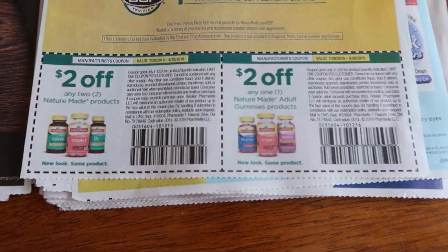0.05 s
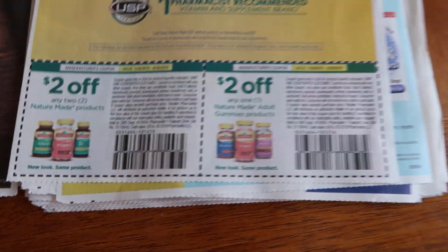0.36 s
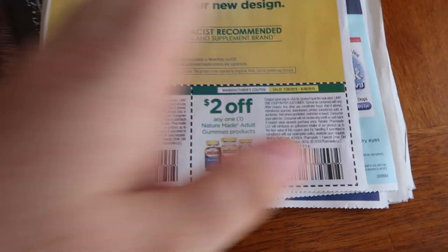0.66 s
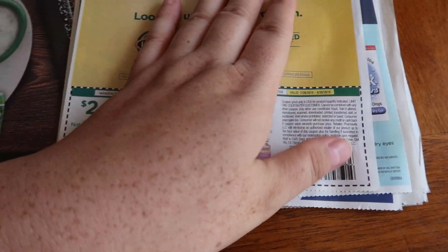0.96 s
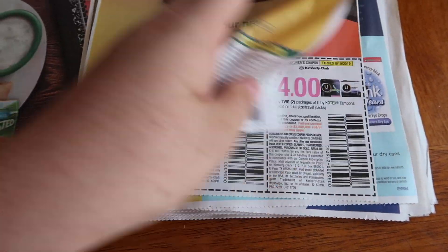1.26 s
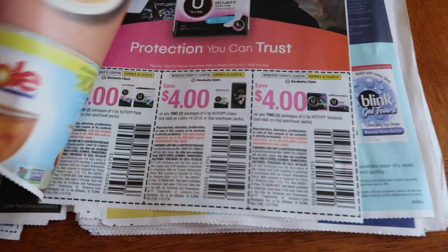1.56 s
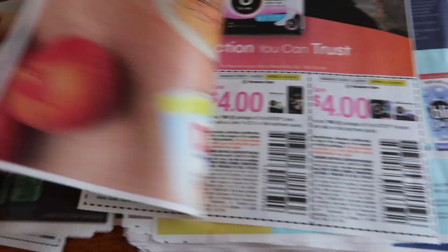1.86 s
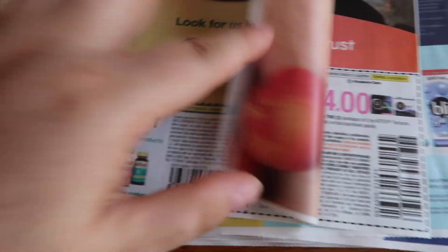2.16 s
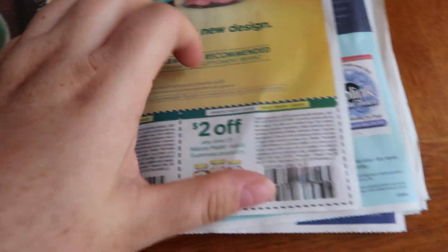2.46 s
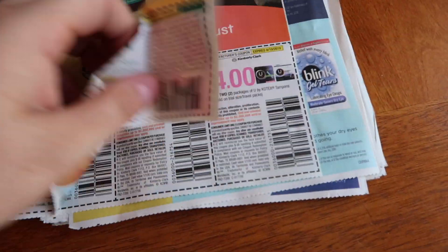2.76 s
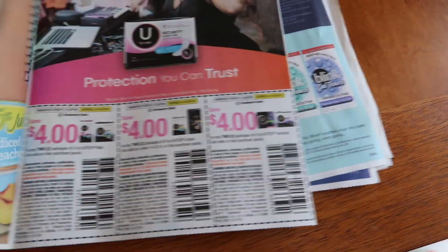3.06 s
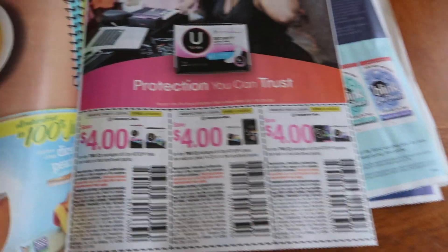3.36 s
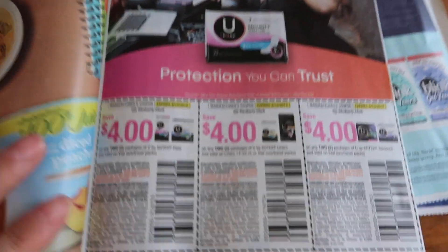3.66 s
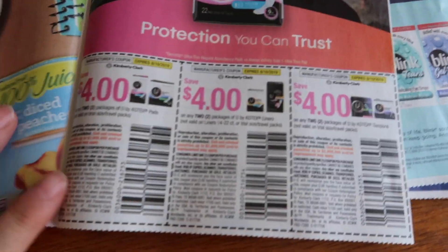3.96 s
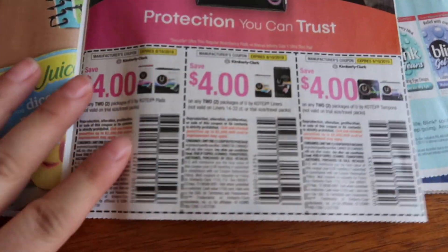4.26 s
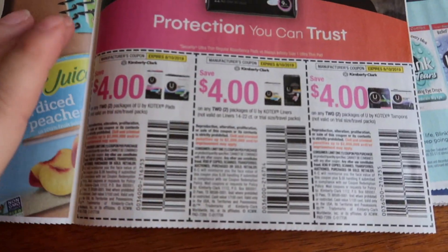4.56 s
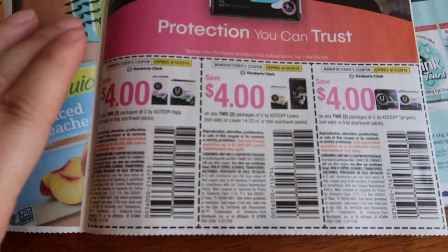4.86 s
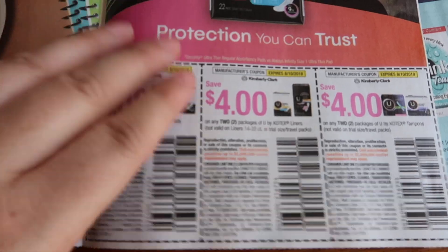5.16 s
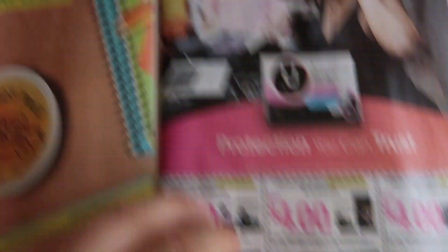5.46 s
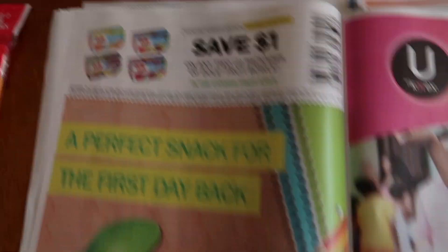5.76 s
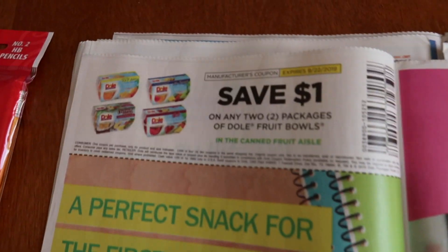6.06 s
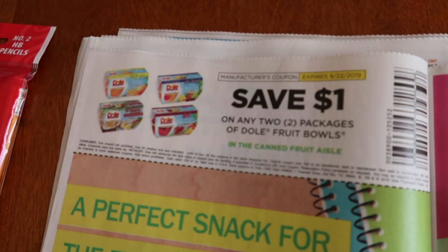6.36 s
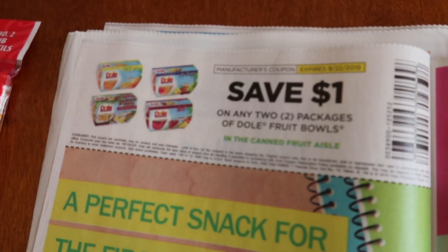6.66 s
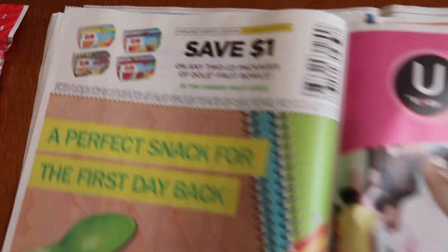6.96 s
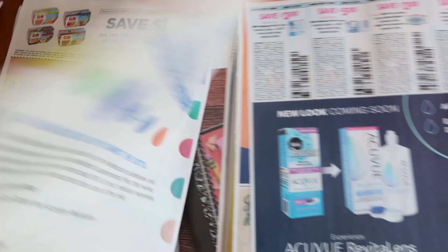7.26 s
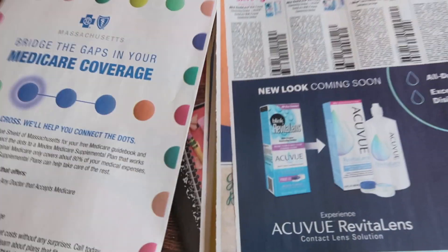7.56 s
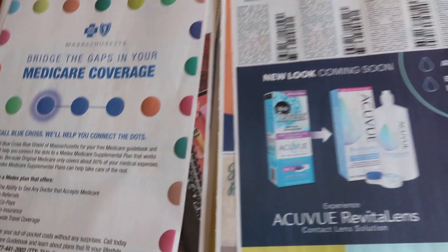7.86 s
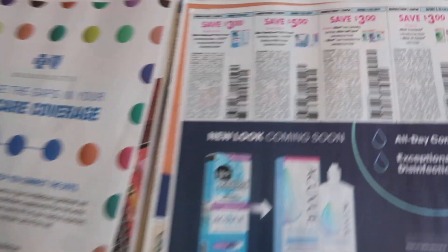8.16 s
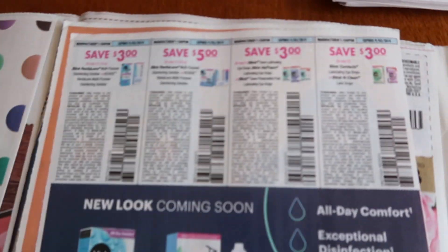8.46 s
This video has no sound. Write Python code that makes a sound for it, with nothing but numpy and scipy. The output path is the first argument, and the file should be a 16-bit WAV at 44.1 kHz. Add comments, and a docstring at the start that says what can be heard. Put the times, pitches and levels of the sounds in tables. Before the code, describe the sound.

Close to the microphone, thin glossy pages slide over each other with a grainy rustle, buckling, scraping and flapping as they are turned on a wooden table. A loud crisp snap stands out, and the stack lands with a thud soon after. Light sliding and scattered ticks lead to one last strong page flip. A faint steady appliance hum and low rush of air fill the small room throughout.

```python
"""An appliance hums over a low rush of air in a small room. Then thin glossy paper inserts are
leafed through on a wooden table, close to the microphone. Sheets slide over each other with grainy
friction, buckle with sharp snaps, scrape with their edges and flap down in swarms of clicks that
ring the paper's resonances. There are dull knocks on the table and soft puffs of air from
flapping pages; the stack is set down once with a thud."""
import sys
import numpy as np
from scipy import signal
from scipy.fft import rfft, irfft
from scipy.io import wavfile
from scipy.ndimage import uniform_filter1d, minimum_filter1d, map_coordinates

SR = 44100
rng = np.random.default_rng(int(sys.argv[2]) if len(sys.argv) > 2 else 0)


def put_to_file(sound):
    """Save the sound as 16-bit audio at rate SR, in the file named by the first command-line argument."""
    columns = np.atleast_2d(sound).T  # one column per channel
    safe = np.clip(columns, -1, 1)
    whole_steps = np.round(safe * 32767)
    wavfile.write(sys.argv[1], SR, whole_steps.astype(np.int16))


N = 374850
TIME_S = np.arange(N) / SR
AGE_S = np.arange(SR // 5) / SR   # time within one short event


def from_db(db):
    """Decibels to gain."""
    return 10 ** (np.asarray(db) / 20)


def unit_rms(x):
    """Scale to rms 1."""
    return x / np.sqrt(np.mean(x ** 2) + 1e-20)


def unit_blow(x):
    """Scale to the energy of 10 ms at rms 1."""
    return unit_rms(x) * np.sqrt(SR / 100 / x.shape[-1])


def at_bins(curve, size):
    """Interpolate a curve over log frequency at the FFT bins."""
    bin_hz = np.maximum(np.fft.rfftfreq(size, 1 / SR), 1)
    hz, values = np.transpose(curve)
    return np.interp(np.log(bin_hz), np.log(hz), values)


def band(x, low_hz, high_hz, order=2):
    """Causal band-pass."""
    edges_hz = np.clip([low_hz, high_hz], 10, .47 * SR)
    return signal.sosfilt(signal.butter(order, edges_hz, "band", fs=SR, output="sos"), x)


def resonance(x, hz, width):
    """One resonance; width relative to its pitch."""
    return band(x, hz / (1 + width), hz * (1 + width), order=1)


def coloured(x, spectrum):
    """Give a noise a spectrum; rms 1."""
    size = x.shape[-1]
    return unit_rms(irfft(rfft(x) * from_db(at_bins(spectrum, size)), size))


def drift(rate_hz):
    """Slow random curve, standard deviation 1."""
    knots = rng.standard_normal(N // 40)
    return np.interp(TIME_S * rate_hz, np.arange(len(knots)), knots) * np.sqrt(3 / 2)


def stereo(mid, side, correlation):
    """Left and right from two independent noises, correlated by frequency."""
    alike = at_bins(correlation, N)
    return irfft(np.sqrt(1 + alike) * rfft(mid) + np.sqrt(1 - alike) * rfft(side) * [[1], [-1]], N)


def add(out, start_s, sound):
    """Mix a sound in at a time."""
    start = round(start_s * SR)
    out[..., start:start + sound.shape[-1]] += sound[..., :N - start]


# motor and mains lines: f/Hz, level/dB
HUM_LINES = [(61, -62.5), (90, -85), (119.7, -57), (180, -59), (241, -61.5), (329, -62), (358, -62.5)]
# swells of the strongest line: t/s, length/s, lift/dB
HUM_SWELLS = [(0.5, 0.62, 6), (3.54, 0.55, 8), (6.516, 0.69, 4)]
# air noise spectrum: f/Hz, relative density/dB
AIR_SPECTRUM = [(20, -12), (44, -1.5), (70, -9.5), (100, -5), (150, -11.5), (200, -5.5), (270, -6.5),
                (350, -7), (480, -14), (650, -14.5), (1380, -21), (2270, -23), (12800, -39.5), (14500, -50)]
# diffuse room sound: f/Hz, left-right correlation
ROOM_CORRELATION = [(60, 1.0), (150, 0.94), (380, 0.61), (950, 0.086), (2380, -0.1), (5980, 0.038),
                    (15000, -0.66)]


def appliance(waver_db=2.0, waver_rad=0.89, ramp_s=0.063, air_db=-49.5):
    """Wavering motor and mains lines over a low rush of air; the strongest line swells and fades."""
    strongest_hz = max(HUM_LINES, key=lambda line: line[1])[0]
    hum = swell_db = 0
    for start_s, length_s, lift_db in HUM_SWELLS:
        inside_s = np.minimum(TIME_S - start_s, start_s + length_s - TIME_S)
        swell_db += lift_db * np.clip(inside_s / ramp_s, 0, 1)
    for hz, db in HUM_LINES:
        gain = from_db(db + swell_db * (hz == strongest_hz) + waver_db * drift(5.0))
        hum += gain * np.sqrt(2) * np.sin(2 * np.pi * hz * TIME_S + waver_rad * drift(8.9))
    air = coloured(stereo(*rng.standard_normal((2, N)), ROOM_CORRELATION), AIR_SPECTRUM)
    return hum + from_db(air_db) * air


def grains(size, spread_db):
    """Tiny slips of fibres: dense clicks of very uneven strength."""
    noise = rng.standard_normal(size)
    return unit_rms(noise * from_db(spread_db * np.minimum(rng.exponential(1, size), 4)))


def crinkles(per_s=80.0, spread_db=6.5):
    """Lone ticks of small creases; rms 1."""
    ticks = (rng.random(N) < per_s / SR) * rng.choice([-1, 1], N)
    strength = from_db(spread_db * rng.uniform(-1.1, 1, N))
    return unit_rms(band(ticks * strength + 1e-18, 900, 8100, order=1))


# sheet drawn over another: t/s, rise/s, steady/s, rustle/dB, body/dB re rustle, hiss/dB re rustle
STROKES = [(0.89, .03, 0.036, -61, -7, -3), (1.08, 0.019, 0.063, -53, -5.5, 4),
           (1.17, 0.041, 0.099, -45.5, -12, -1.5), (1.32, 0.023, .14, -48.5, -1, 0.5),
           (1.55, 0.028, 0.24, -58, 6, 3), (1.754, 0.026, 0.059, -42.5, -3.5, -34),
           (1.95, 0.019, 0.0082, -54.5, 0, -4.5), (2.05, 0.0062, 0.055, -56, 4, -21),
           (2.163, 0.0091, 0.011, -41, -6, -26), (2.21, 0.019, 0.098, -42.5, -5.5, -9),
           (2.33, 0.018, 0.056, -45, -2.5, -4), (2.41, 0.053, 0.034, -62.5, 10.5, 1),
           (2.605, 0.0088, .01, -52, -3.5, -5), (2.651, 0.0044, 0.023, -43.5, -4.5, -2.5),
           (2.69, 0.0093, 0.091, -45.5, 1.5, -3), (2.81, 0.043, 0.027, -41, -3, -1),
           (2.91, 0.023, 0.08, -48, 3, -1), (3.005, 0.0041, 0.051, -40, -9, -7),
           (3.08, 0.019, 0.074, -49, 6, -6), (3.2, 0.0097, 0.035, -41.5, 1, -11.5),
           (3.28, 0.048, 0.07, -53.5, 6.5, -10), (3.375, 0.022, 0.047, -53, 8.5, -3),
           (3.44, 0.032, 0.1, -53, 3.5, -7.5), (3.59, 0.02, 0.083, -66.5, 9.5, 6.5),
           (3.71, 0.02, 0.13, -52.5, -1, -2), (3.85, 0.016, 0.041, -38, -1.5, -9.5),
           (3.97, 0.043, 0.034, -64, -3, 5), (4.07, 0.038, 0.19, -53, -4, 4.5),
           (4.221, 0.041, 0.02, -46, -14, 0), (4.32, 0.045, 0.037, -52.5, -4.5, 3.5),
           (5.263, 0.0097, 0.009, -48.5, 0, -4), (5.33, 0.076, 0.016, -53.5, -1, -4),
           (5.415, 0.038, .012, -44, -11, -6), (5.52, 0.063, 0.023, -55, -9, 1),
           (5.6, 0.055, 0.039, -44.5, -12, -1), (5.754, 0.0059, 0.0069, -51, -7, -7),
           (5.854, 0.016, 0.037, -48, -9.5, 1), (5.94, 0.029, 0.017, -49.5, -9, -5.5),
           (6.18, 0.02, 0.019, -51, -9.5, -8), (6.25, 0.022, .015, -54.5, -11, -9.5),
           (6.62, 0.098, 0.021, -50.5, -15, -7), (6.842, 0.02, 0.0046, -47, -11.5, -4),
           (6.92, 0.04, 0.14, -54.5, -7.5, -2), (7.07, 0.011, 0.065, -38, -3.5, -6.5),
           (7.18, 0.013, 0.093, -42.5, -1, -5.5), (7.32, 0.019, 0.062, -47, -2.5, -9),
           (7.395, 0.016, 0.0046, -44.5, 5, -7.5), (7.49, 0.013, 0.075, -62, 9.5, 1),
           (7.59, 0.023, 0.088, -56.5, 5, -8), (7.75, 0.021, 0.13, -60, 2, -2),
           (7.93, 0.037, 0.0091, -47, -8, -9)]


def stroke_levels_db(times_s, glide_t60_s=0.35):
    """Body, rustle and hiss levels: each stroke speeds up, holds and glides to rest."""
    power = np.full((3, len(times_s)), 1e-10)
    for start_s, rise_s, steady_s, db, body_db, hiss_db in STROKES:
        gliding_s = np.maximum(times_s - start_s - rise_s - steady_s, 0)
        speed = np.clip((times_s - start_s) / rise_s, 0, 1) * from_db(-60 * gliding_s / glide_t60_s)
        power += np.outer(from_db([db + body_db, db, db + hiss_db]), speed) ** 2
    return 10 * np.log10(power)


# resonances of a bent sheet: frequency ratio, nominal lift/dB
BEND_MODES = [(1, 2), (2.05, 1)]


def bending_db(hz, times_s, tautness_db, db_per_oct=7.5, wander_oct=.12, width_oct=.25, weak_db=3.5):
    """Two resonances rise as the sheet tautens; many weak ones wander, merging into hiss up high."""
    bend_hz = np.clip(1130 * 2 ** (tautness_db / db_per_oct), 1390, 3000)
    bend_hz *= 2 ** (wander_oct * np.interp(times_s, TIME_S, drift(22)))
    gain_db = 0
    for ratio, lift_db in BEND_MODES:
        offset_oct = np.log2((hz + 1) / (ratio * bend_hz))
        gain_db += lift_db * (np.exp(-(offset_oct / width_oct) ** 2) - .1)
    grid = np.broadcast_arrays(np.sqrt(hz) / 1.8, times_s * 16)
    weak_modes = map_coordinates(rng.standard_normal((128, 256)), grid, order=2, mode="mirror")
    return gain_db + weak_db * weak_modes / np.hypot(1, hz / 4500)


# paper friction spectrum: f/Hz, relative density/dB
FRICTION_SPECTRUM = [(200, -4.5), (500, -4), (1000, -5), (1400, -4), (1850, -2.5), (2800, -3), (4200, -5),
                     (6200, -9), (9000, -14.5), (13000, -16), (14700, -28), (15600, -43)]
# close friction sound: f/Hz, left-right correlation
FRICTION_CORRELATION = [(300, 0.99), (2000, 1), (5000, 0.82), (12000, 0.71)]


def sliding(catch_db=1.44, crinkle_db=-13.0):
    """Paper drags over paper in grains, catching and letting go, coloured by the bending sheets."""
    slips = stereo(grains(N, spread_db=2.5), grains(N, spread_db=1.0), FRICTION_CORRELATION)
    friction = coloured(unit_rms(slips) + from_db(crinkle_db) * crinkles(), FRICTION_SPECTRUM)
    hz, times_s, frames = signal.stft(friction, SR, nperseg=512)
    hz = hz[:, None]
    body_db, rustle_db, hiss_db = stroke_levels_db(times_s)
    gain_db = bending_db(hz, times_s, tautness_db=rustle_db - body_db)
    # three bands, each following its level, crossfaded between centres
    bands_hz, centres_hz = [(400, 1500), (1500, 5000), (5000, 14000)], [1000, 2600, 7000]
    for db, edges_hz, weights in zip((body_db, rustle_db, hiss_db), bands_hz, np.eye(3)):
        lift_db = db - 10 * np.log10(np.mean(band(friction, *edges_hz) ** 2))
        gain_db += lift_db * np.interp(np.log2(hz + 1), np.log2(centres_hz), weights)
    rustle = signal.istft(frames * from_db(gain_db), SR)[1][:, :N]
    return rustle * from_db(catch_db * drift(130))


def bending_wave(spread_s):
    """A click dispersed by paper: high pitches arrive first."""
    hz = np.fft.rfftfreq(len(AGE_S), 1 / SR)
    delay_s = spread_s / np.sqrt(1 + hz / 1000)
    return unit_blow(irfft(np.exp(-2j * np.pi * np.cumsum(delay_s) * hz[1]), len(AGE_S)))


def swarm(t60_s, rise_s, spread_db, side_gain):
    """Dying clicks from all over a sheet, slightly different left and right."""
    mid, side = grains(len(AGE_S), spread_db), grains(len(AGE_S), spread_db)
    envelope = from_db(-60 * AGE_S / t60_s) * (1 - np.exp(-AGE_S / rise_s))
    return unit_blow((mid + side_gain * side * [[1], [-1]]) * envelope)


def sheet(push, ring_db, ring_hz, ring_width, body_db, body_hz, body_width, crack_db, crack_hz):
    """A pushed sheet: lingering panel ring, low whole-page body, crack from the crease."""
    ring = unit_blow(resonance(resonance(push, ring_hz, 2.03 * ring_width), ring_hz, 1.78 * ring_width))
    linger = unit_blow(resonance(ring, ring_hz, width=.04))
    ring = unit_blow(ring + from_db(-22) * linger)
    body = unit_blow(resonance(resonance(push, body_hz, body_width), body_hz, 1.3 * body_width))
    crack = unit_blow(band(push, crack_hz / 1.9, crack_hz * 1.04))
    return from_db(ring_db) * (ring - from_db(body_db) * body + from_db(crack_db) * crack)


# sheet buckles: t/s, ring/dB, ring/Hz, nominal relative width, body/dB re ring,
# crack/dB re ring, crack/Hz, flutter/dB re pop
SNAPS = [(1.1369, -40, 3160, 0.39, -1.5, -17, 7000, -3), (1.2483, -31, 3170, 0.21, -9.5, -16, 9150, -2),
         (1.2604, -40, 4300, 0.26, -18, -14, 8500, -8), (1.4272, -40, 2930, 0.22, -15, -27, 7500, -6),
         (1.816, -28, 2620, 0.24, -6, -18, 6140, -1), (2.057, -33.5, 2700, 0.11, -9, -18, 4660, -11),
         (2.0658, -49, 1850, .2, -4, -10, 5000, -12), (2.2168, -46, 2500, 0.22, -8, -13, 6500, -6),
         (2.2322, -39.5, 2600, 0.25, -6, -14, 6500, -6), (2.2464, -40, 2800, .2, -9, -16, 6500, -9),
         (2.2552, -40, 3300, 0.2, -18, -12, 6500, -12), (2.3485, -31.5, 2580, 0.28, -3.5, -14, 7000, 7),
         (2.355, -25.5, 3700, 0.21, -16, -28, 9200, 6), (2.618, -53, 3700, 0.24, -9, -17, 6500, 1),
         (2.6418, -44.5, 4500, 0.32, -5, -5, 7440, 2), (2.748, -43, 2800, .25, -2, -14, 6500, -6),
         (2.8465, -39, 2800, .35, -9, -7, 8500, 2), (2.8567, -29, 2450, 0.3, -4.5, 5, 12600, -9),
         (2.9312, -39, 3600, .45, -15, -2, 8200, -2), (2.9461, -36.5, 4500, 0.16, 3, -8, 8000, -3),
         (2.979, -33, 2730, 0.4, -19, -10, 5970, -1), (3.0066, -10, 3050, 0.13, -9.5, -13, 8600, -18),
         (3.012, -25.5, 2700, 1, -9.5, -16, 7000, 2), (3.414, -49, 2700, 0.35, -12, -19, 5500, -6),
         (3.719, -45.5, 1700, 0.23, -4, -20, 5500, 1), (4.139, -36, 2880, 0.91, -27, -30, 7500, -13),
         (4.1882, -41, 3000, 0.35, -10, -15, 7000, -10), (4.386, -40.5, 2760, .15, -19, -17, 5930, 0.5),
         (4.388, -37, 2630, 0.18, -18, -6, 6550, -5), (4.9033, -48.5, 2260, 0.33, -4, -21, 7000, 2),
         (5.27, -46, 2020, 0.25, -4, -19, 7000, 5), (5.2854, -44, 2660, 0.14, -4, -13, 6500, -2),
         (5.3978, -53, 2770, 0.26, 2, -15, 5500, 3), (5.614, -51, 3670, 0.26, -3, -15, 6000, -10),
         (5.7027, -43.5, 4800, .16, -9, -15, 6370, -9), (5.755, -45, 2900, 0.56, -3, -18, 6500, 4),
         (6.122, -52.5, 3120, 0.15, -1.5, -26, 7000, 6), (6.9007, -33.5, 2520, 0.42, -31, -26, 6360, -4),
         (6.909, -39, 2320, 0.23, -9, -20, 6500, 0), (7.0915, -27.5, 2240, 0.33, -11, -22, 6000, -4),
         (7.118, -31.5, 2220, 0.28, 0.5, -8, 7200, -8), (7.1903, -29, 1940, 0.6, -6, -14, 7050, -14),
         (7.428, -46, 1500, .35, 4, -23, 5000, -6), (7.8186, -43, 1720, 0.24, -12, -25, 5000, -2)]


def snaps(body_hz=800, body_width=0.91, jitter_gain=.55):
    """A buckle pops through in a millisecond or two; bending waves cross the sheet and flutter out."""
    out = np.zeros((2, N))
    for start_s, db, hz, width, body_db, crack_db, crack_hz, flutter_db in SNAPS:
        jitter = swarm(t60_s=0.0059, rise_s=0.000098, spread_db=5.0, side_gain=0.055)
        pop = unit_blow(bending_wave(spread_s=0.000785) + jitter_gain * jitter)
        flutter = swarm(t60_s=0.046, rise_s=0.0011, spread_db=10.5, side_gain=0.062)
        push = pop + from_db(flutter_db) * flutter
        add(out, start_s, sheet(push, db, hz, width, body_db, body_hz, body_width, crack_db, crack_hz))
    return out


# edge scrapes the sheet below: t/s, length/s, start f/Hz, end f/Hz, level/dB
SCRAPES = [(1.215, .11, 1520, 1270, -46.5), (1.358, 0.067, 1590, 1340, -46),
           (3.011, 0.066, 3100, 2780, -42.5), (3.219, 0.12, 1460, 1340, -47),
           (3.468, 0.099, 1260, 1410, -53), (3.854, 0.03, 1920, 2100, -38),
           (3.884, 0.033, 2410, 2520, -37.5), (3.922, .026, 2800, 2600, -41.5),
           (4.24, .07, 2700, 2500, -59), (5.431, 0.065, 2600, 2700, -50.5)]


def scrapes(slip_db=4.0, half_width=0.084):
    """An edge drags in small slips, ringing one resonance of the bowed sheet; it glides with the bow."""
    out = np.zeros(N)
    for start_s, length_s, from_hz, to_hz, db in SCRAPES:
        progress = np.linspace(0, 1, int(length_s * SR))
        carrier = np.exp(2j * np.pi * np.cumsum(from_hz + (to_hz - from_hz) * progress) / SR)
        # gliding band-pass: shift down, low-pass, shift back
        low_pass = signal.butter(2, half_width * from_hz, fs=SR, output="sos")
        ring = np.real(carrier * signal.sosfilt(low_pass, grains(len(progress), slip_db) / carrier))
        add(out, start_s, from_db(db) * unit_rms(ring * np.sqrt(progress * (1 - progress))))
    return out


# sheet flaps or crumples: t/s, ring/dB, ring/Hz, nominal relative width, body/dB re ring, body/Hz,
# crack/dB re ring, crack/Hz, rise/s, t60/s
FLAPS = [(1.268, -45, 1500, .3, -8, 700, -12, 7000, .0005, 0.036),
         (1.289, -47, 1380, .12, -3, 700, -14, 7000, .001, .04),
         (1.355, -42, 1540, .12, -9, 700, -21, 7000, .001, .04),
         (1.394, -34.5, 1500, 0.3, -3, 990, -20, 7000, .008, 0.049),
         (1.7223, -34, 2700, 0.59, -11, 744, -7, 7750, 0.0035, 0.025),
         (1.773, -29.5, 2600, 0.28, -5, 1170, -26, 6000, .02, 0.056),
         (1.795, -29, 2470, 0.2, -1.5, 1100, -30, 6000, 0.0046, .075),
         (1.82, -40.5, 2500, 0.23, 8.5, 1100, -28, 6000, .001, 0.093),
         (2.1647, -39, 2200, .3, -3, 900, -25, 7000, 0.00088, .05),
         (2.18, -42, 2100, 0.21, 3.5, 840, -26, 7000, .005, .06),
         (2.2383, -44, 2500, .25, -6, 1000, -16, 7000, .0005, .022),
         (2.2562, -37, 3100, .2, -2, 1500, -18, 7000, .001, 0.03),
         (2.277, -34, 2420, .13, -11, 1100, -22, 7000, .003, 0.032),
         (2.293, -33.5, 2500, 0.39, -18, 1100, -12, 8500, .004, 0.065),
         (2.317, -40, 2100, .3, 0, 900, -13, 8000, 0.0027, .06),
         (2.6548, -32.5, 4300, 0.14, -10, 910, -3, 7840, .003, 0.0095),
         (2.696, -36, 3200, 0.13, -13, 1100, -25, 7600, .001, 0.042),
         (2.7185, -41, 3240, 0.1, -15, 1100, -22, 7000, .001, .025),
         (2.763, -34.5, 3240, 0.15, -5, 1200, -18, 8000, .001, .026),
         (2.779, -34, 2820, 0.14, -20, 1200, -15, 7000, .002, .021),
         (2.802, -34, 2450, .13, -11, 1000, -15, 7000, .001, .025),
         (3.0724, -38, 2420, .35, 3, 860, -5, 5670, 0.0009, .044),
         (3.108, -46, 1700, .3, 7, 690, -14, 5000, .003, 0.072),
         (3.166, -40, 2300, .4, -7, 1100, -7, 5750, 0.0017, 0.047),
         (3.2, -38.5, 2320, .3, -2.5, 800, -18, 5500, .001, .034),
         (3.213, -34.5, 1900, 0.41, -10, 1100, -6, 5470, 0.0018, 0.047),
         (3.25, -34, 1770, 0.27, 4, 1120, -26, 5500, 0.011, 0.15),
         (3.262, -34.5, 2230, 0.22, -14, 1190, -32, 5500, .001, 0.054),
         (3.377, -34.5, 2580, 0.32, -10, 1200, -20, 5800, 0.0011, 0.055),
         (3.386, -35, 1980, 0.33, 2, 1100, -18, 4970, 0.00045, 0.28),
         (3.568, -46.5, 2380, 0.31, -6, 1200, -20, 5000, 0.00095, .04),
         (3.862, -39, 2780, 0.22, -10, 900, -20, 5500, .006, .04),
         (3.8882, -35, 2800, 0.22, -13, 1000, -15, 6000, .0005, .05),
         (3.9161, -29.5, 3000, 0.2, -20, 1100, -17, 5500, .002, 0.05),
         (3.938, -39, 2400, .3, -10, 890, -13, 5500, .001, 0.067),
         (5.762, -39, 3400, 0.32, -5, 1200, -15, 6500, 0.0027, 0.11),
         (6.076, -55, 2670, 0.12, -12, 1200, -22, 6000, .001, .04),
         (7.0848, -28, 2200, 0.42, -19, 1000, -1.5, 6540, .0005, 0.047),
         (7.09, -25.5, 2210, 0.37, -8, 1000, -20, 6000, .001, 0.053),
         (7.1115, -31.5, 2130, .25, -8, 900, -22, 6500, .0003, 0.025),
         (7.1185, -29, 2200, .22, -8, 1000, -22, 6500, .0005, 0.032),
         (7.135, -42, 2500, 0.22, -8, 1100, -16, 6000, .002, .04),
         (7.184, -27, 2360, 0.78, 1, 1330, -21, 7100, .015, 0.061),
         (7.253, -31, 2010, 0.23, -14, 900, -4.5, 5730, .003, 0.027),
         (7.261, -37, 1900, 0.24, -4, 900, -1, 6000, 0.0018, 0.059),
         (7.417, -38.5, 2200, 0.45, 1, 1090, -24, 4970, 0.015, .085)]


def flaps(body_width=0.37):
    """A sheet lands or crumples bit by bit: a short swarm of clicks builds up and dies."""
    out = np.zeros((2, N))
    for start_s, db, hz, width, body_db, body_hz, crack_db, crack_hz, rise_s, t60_s in FLAPS:
        push = swarm(t60_s, rise_s, spread_db=2.8, side_gain=0.028)
        add(out, start_s, sheet(push, db, hz, width, body_db, body_hz, body_width, crack_db, crack_hz))
    return out


# table knocks and page air puffs: t/s, level/dB, low f/Hz, high f/Hz, burst t60/s
KNOCKS_AND_PUFFS = [(2.353, -34.5, 80, 490, 0.039), (2.601, -38.5, 445, 890, 0.047),
                    (3.0055, -24.5, 80, 1000, 0.0083), (3.073, -33, 90, 700, 0.049),
                    (3.626, -37, 160, 272, 0.37), (3.7767, -24, 25, 1390, 0.06),
                    (3.786, -24.5, 25, 1400, 0.032), (3.797, -25.5, 25, 700, 0.047),
                    (3.807, -24.5, 300, 910, 0.057), (3.824, -30, 25, 950, 0.25),
                    (7.089, -33.5, 554, 960, 0.024), (7.116, -32.5, 547, 950, 0.032),
                    (7.188, -34.5, 580, 950, 0.065), (7.426, -37, 25, 200, 0.82)]
# dull noise burst: f/Hz, relative density/dB
BURST_SPECTRUM = [(18, -21), (30, -1.5), (70, -4), (148, -16), (214, 1), (286, -11.5), (630, -3.5),
                  (1060, -11), (1190, -13), (1290, -17.5), (3000, -17), (3900, -53), (6600, -120)]
# table top modes: f/Hz, relative level/dB, uncapped t60/s
TABLE_MODES = [(196, 14, 0.021), (354, -3, 0.36), (420, -16, 0.49), (505, -20, 0.06), (624.5, 7, 0.27),
               (785, 1.5, 0.29), (1040, -21, 0.36)]


def knocks_and_puffs(ring_db=-9.5, max_ring_t60_s=.25, rise_s=0.00037):
    """Dull knocks on the table and soft puffs of air from flapping pages: band-passed noise and ring."""
    out = np.zeros(N)
    for start_s, db, low_hz, high_hz, t60_s in KNOCKS_AND_PUFFS:
        burst = coloured(rng.standard_normal(len(AGE_S)), BURST_SPECTRUM) * from_db(-60 * AGE_S / t60_s)
        ring = 0
        for hz, mode_db, mode_t60_s in TABLE_MODES:
            decay = from_db(mode_db - 60 * AGE_S / min(mode_t60_s, max_ring_t60_s))
            ring += decay * np.sin(2 * np.pi * (hz * AGE_S + rng.random()))
        blow = (unit_blow(burst) + from_db(ring_db) * unit_blow(ring)) * (1 - np.exp(-AGE_S / rise_s))
        add(out, start_s, from_db(db) * unit_blow(band(blow, low_hz, high_hz)))
    return out


# where the paper is handled: t/s, left minus right/dB
PAPER_BEARING = [(1.2, 0.34), (1.45, 0.6), (1.8, 0.54), (2.3, 0.5), (2.75, 0.37), (3.0, 1.22), (3.3, 0.5),
                 (4.2, 1), (5.35, 0.5), (5.8, 0.5), (6.9, -0.5), (7.2, -0.5), (7.42, 0.5), (8.0, 1)]


def microphone_ports(paper, lag_samples_per_db=2.03):
    """The closer port hears the paper louder and a sample or so earlier."""
    half_db = np.interp(TIME_S, *np.transpose(PAPER_BEARING)) / 2
    ports = []
    for channel, db in zip(paper, (half_db, -half_db)):
        shifted = map_coordinates(channel, [np.arange(N) + db * lag_samples_per_db], order=3)
        ports.append(from_db(db) * shifted)
    return np.array(ports)


def room(x, wet_db=-27.0, t60_s=.45, gap_s=.004):
    """Walls return a short, dull, diffuse tail."""
    echoes = stereo(*rng.standard_normal((2, N)), ROOM_CORRELATION)[:, :SR // 2]
    age_s = TIME_S[:SR // 2]
    tail = band(echoes, 130, 7500, order=1) * from_db(-60 * age_s / t60_s) * (age_s > gap_s)
    tail /= np.sqrt(np.mean(np.sum(tail ** 2, axis=1)) * SR / 2 / 5000)   # energy of a unit 5 kHz band
    return from_db(wet_db) * signal.fftconvolve(x[None], tail, axes=1)[:, :N]


def scene(echo_s=.0053, echo_db=-21.5):
    """Close paper, one reflection off a near surface, the room and its appliance."""
    paper = sliding() + snaps() + flaps() + scrapes() + knocks_and_puffs()
    add(paper, echo_s, from_db(echo_db) * paper)
    return microphone_ports(paper) + room(paper.mean(axis=0)) + appliance()


def record(dry, cutoff_hz=15600, ceiling=.93):
    """Steep low-pass, then a fast limiter that holds peaks just under full scale."""
    cut = signal.sosfilt(signal.ellip(10, .1, 80, cutoff_hz, fs=SR, output="sos"), dry)
    gain = ceiling / np.maximum(np.abs(cut).max(axis=0), ceiling)
    return cut * uniform_filter1d(minimum_filter1d(gain, size=61), size=61)


dry = scene()
out = record(dry)
put_to_file(out)
```